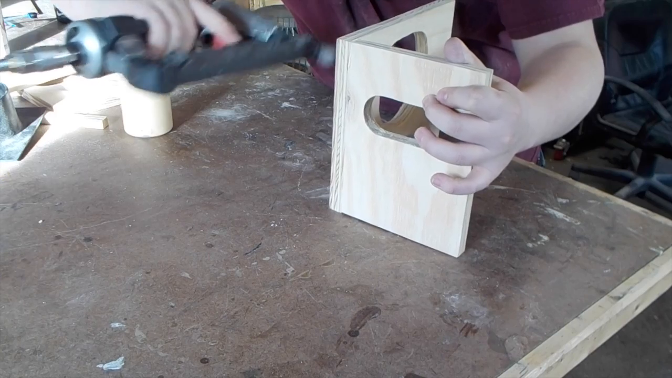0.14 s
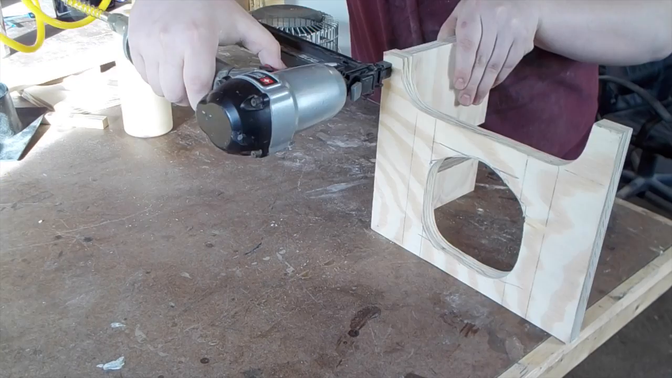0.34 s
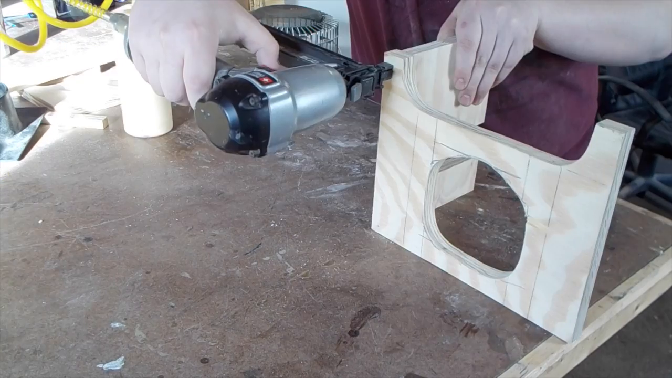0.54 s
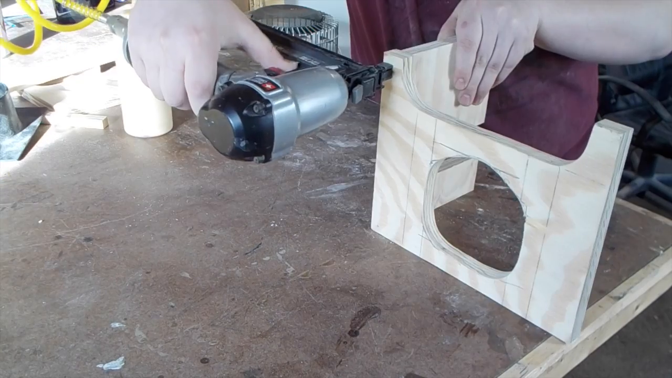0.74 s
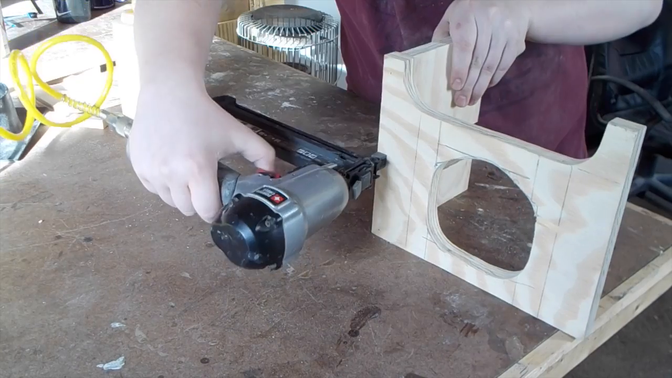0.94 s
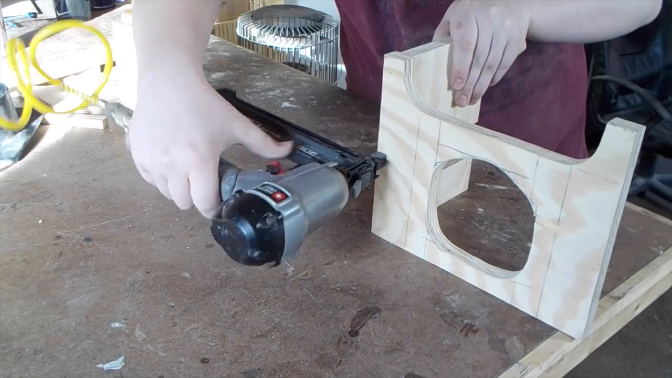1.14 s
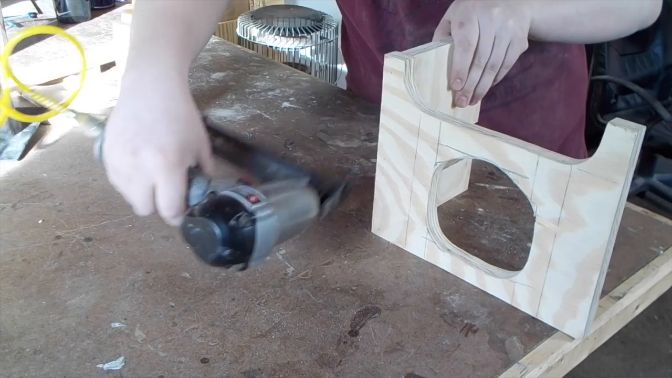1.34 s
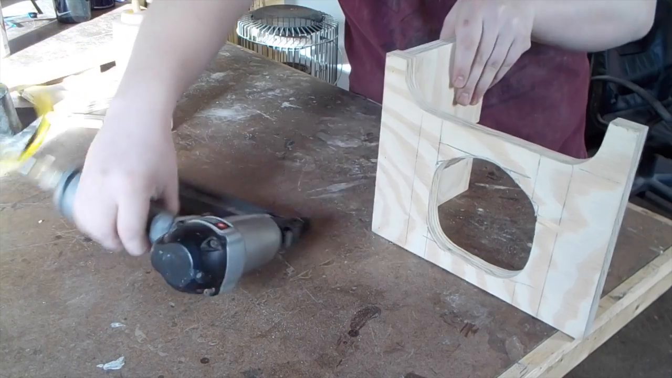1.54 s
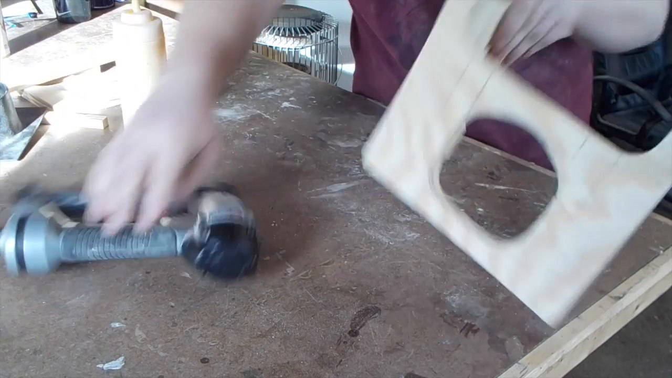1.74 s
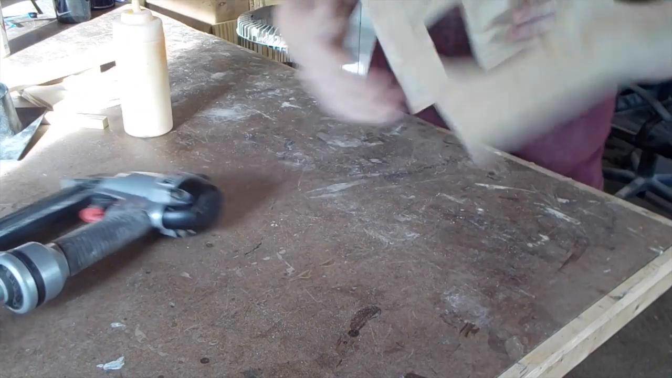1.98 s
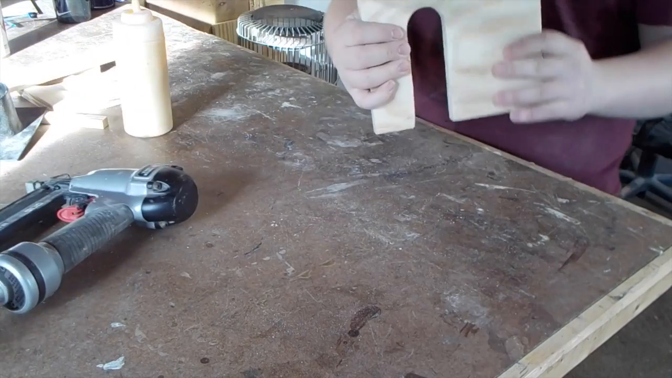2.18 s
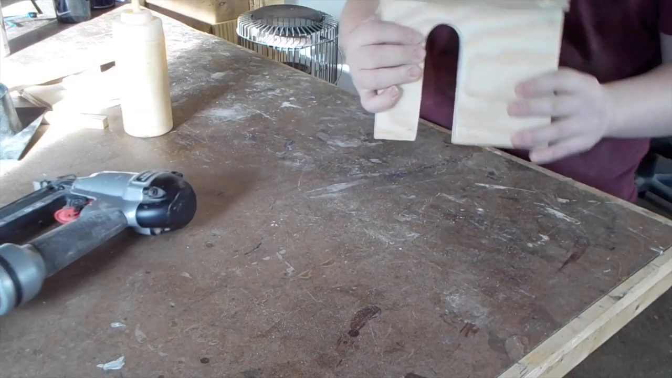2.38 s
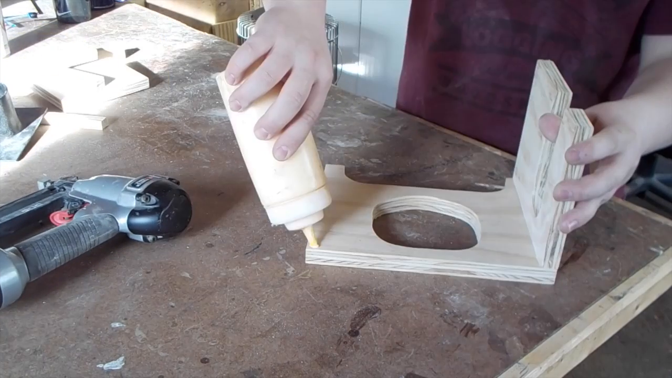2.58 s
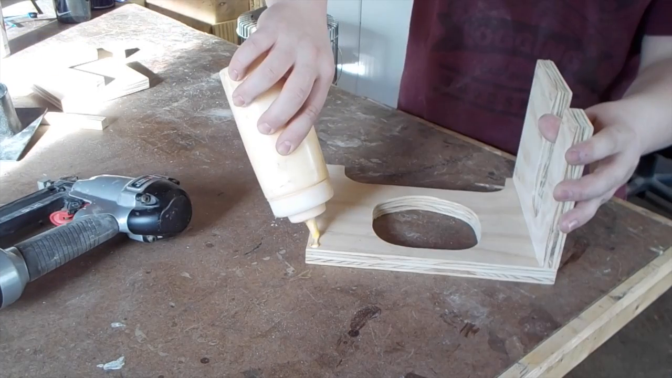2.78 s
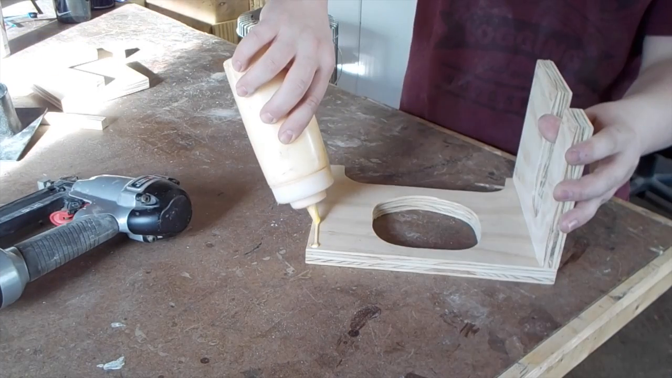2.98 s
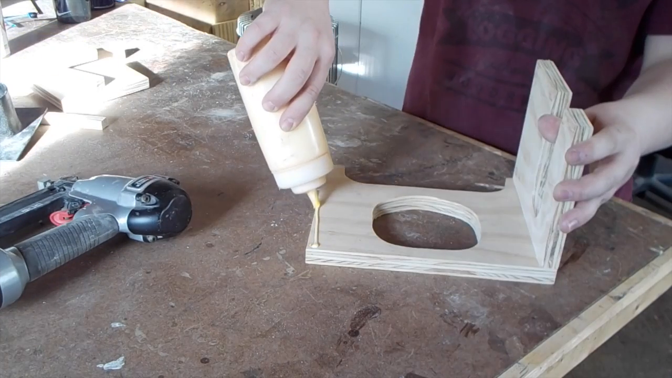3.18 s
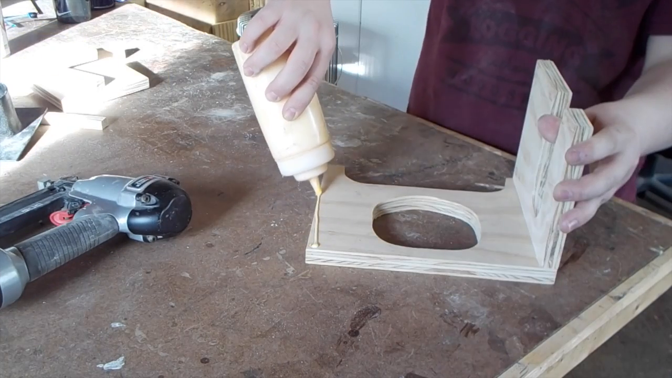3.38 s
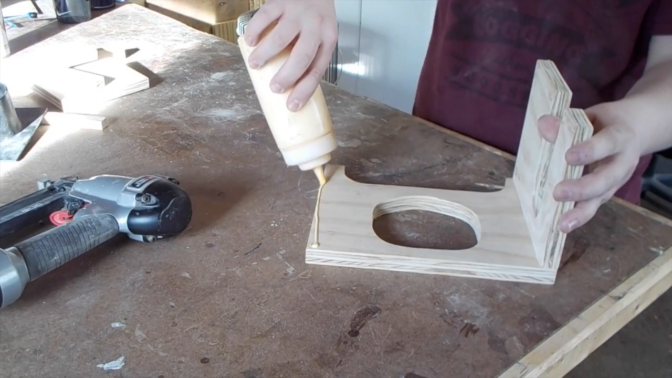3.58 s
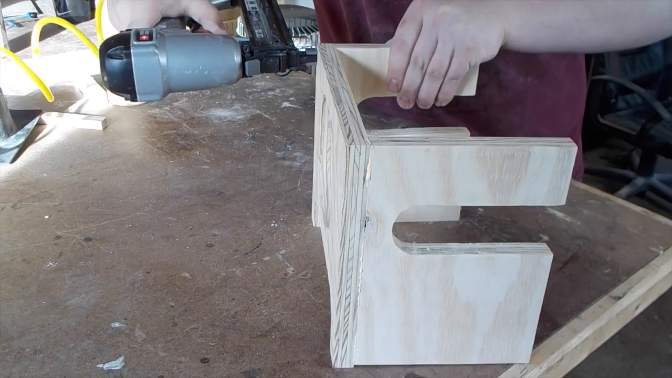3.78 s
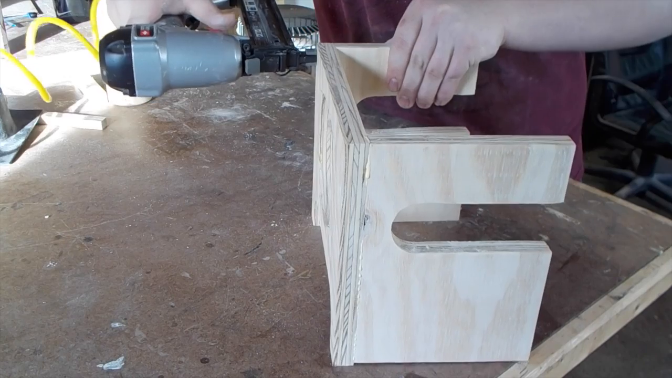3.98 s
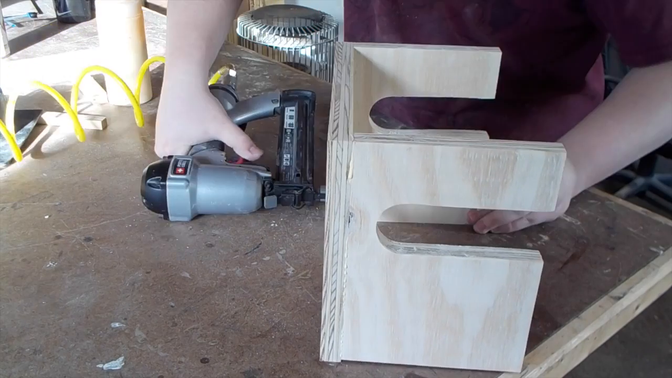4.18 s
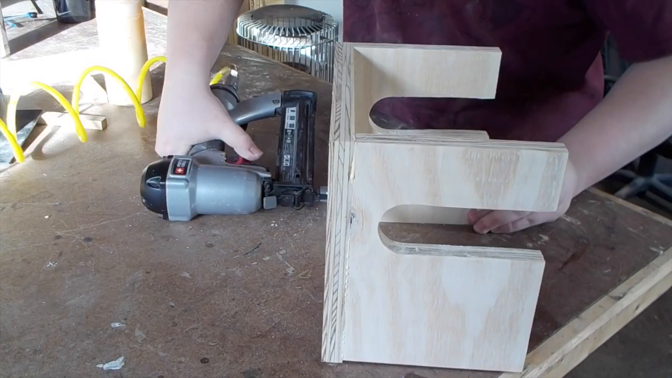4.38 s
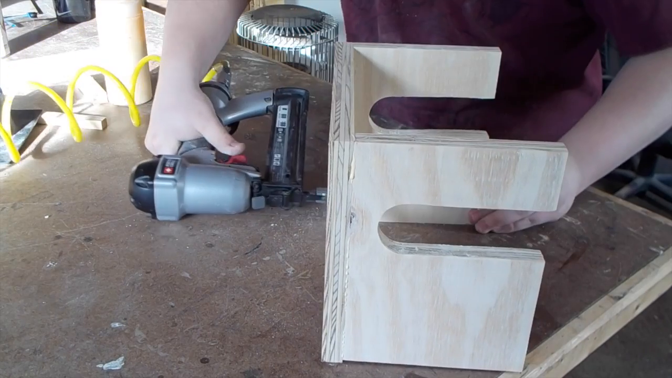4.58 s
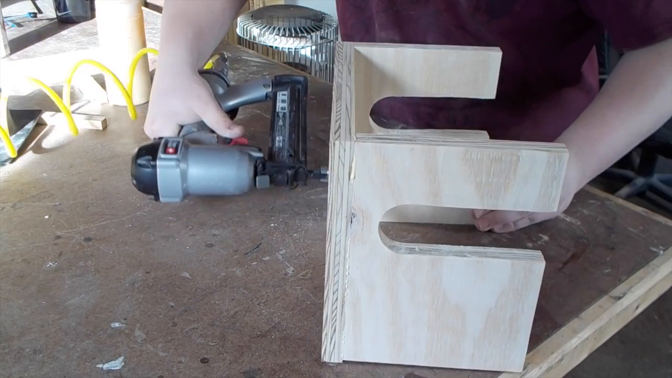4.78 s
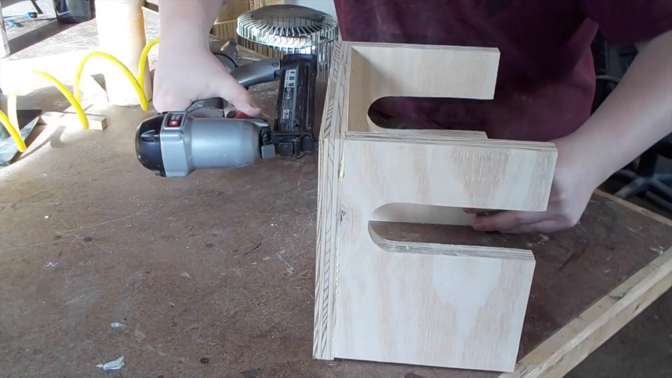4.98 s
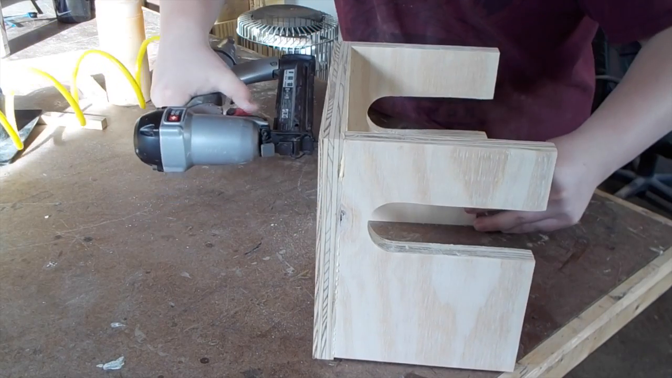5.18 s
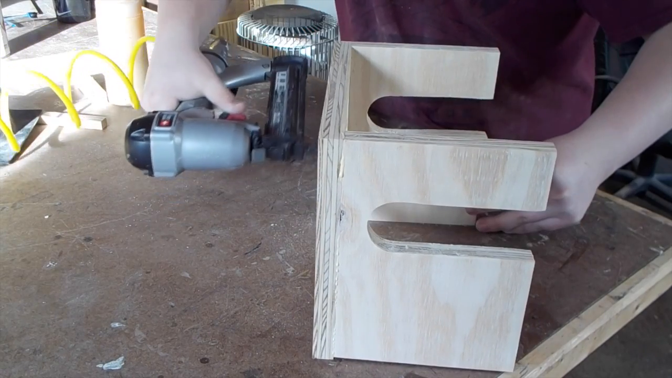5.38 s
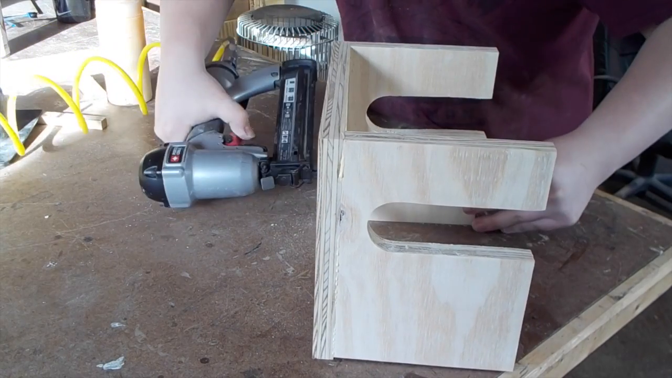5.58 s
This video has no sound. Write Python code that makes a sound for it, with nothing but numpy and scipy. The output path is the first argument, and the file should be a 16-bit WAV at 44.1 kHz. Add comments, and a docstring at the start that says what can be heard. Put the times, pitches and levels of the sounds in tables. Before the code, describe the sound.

Sharp nail gun cracks with short air puffs come in two runs, separated by a clatter, wooden bumps and a brief pause.

```python
"""A puff of exhaust air dies away, then a pneumatic brad nailer tacks plywood on a workbench, twice.
Each shot is a spit of turbulent air from the trigger valve, the crack of the driver's impact, and a
puff as the trigger is let go. The gun is put down with a clatter that excites the modes of the bench;
boards bump, slide and creak; four more shots follow. The camera's gain control ducks at every crack
and, recovering, holds up the reverberation of the workshop."""
import sys
import numpy as np
from scipy import signal
from scipy.fft import rfft, irfft, next_fast_len
from scipy.io import wavfile
from scipy.ndimage import uniform_filter1d, map_coordinates

SR = 44100
rng = np.random.default_rng(int(sys.argv[2]) if len(sys.argv) > 2 else 0)


def master_out(mix):
    """Clip the mix to full scale and print it as 16-bit PCM to the path in sys.argv[1]."""
    frames = np.transpose(np.atleast_2d(mix))
    ceiling = np.clip(frames, -1, 1)
    pcm = np.round(ceiling * 32767).astype(np.int16)
    wavfile.write(sys.argv[1], SR, pcm)


N = 248283
LEAD = SR // 2  # samples of scene before time zero
AGE = np.arange(SR) / SR  # time within one event, t/s
FRAME_HZ = 545  # hollow note of the glued plywood frame
REBOUND_S, REBOUND_DB = .021, -7  # a knock or bump rebounds once, weaker

# spectrum of a wooden thud: f/Hz, level/dB
THUD_SPECTRUM = [(40, -4.5), (150, 10), (300, 7.5), (1000, 5.5), (2000, 6.5), (4000, -21.5), (8000, -25),
                 (15000, -25)]
# spectrum of a metal click: f/Hz, level/dB
CLICK_SPECTRUM = [(100, -23.5), (1000, -3), (3000, 2), (6500, 3), (10000, 10.5), (15000, 9)]


def amp(db):
    """Decibel law: the amplitude ratio of a level."""
    return 10 ** (np.asarray(db) / 20)


def along(points, hz):
    """Interpolation of (f/Hz, value) points on a logarithmic frequency axis."""
    f, values = np.transpose(points)
    return np.interp(np.log(hz + 1), np.log(f + 1), values)


def colour(x, spectrum):
    """Minimum-phase filtering: folding the cepstrum makes a (f/Hz, level/dB) curve causal."""
    n = x.shape[-1]
    m = 2 * next_fast_len(n // 2 + 4096)
    gain = amp(along(spectrum, np.fft.rfftfreq(m, 1 / SR)))
    cepstrum = irfft(np.log(gain))
    cepstrum[1:m // 2] *= 2
    cepstrum[m // 2 + 1:] = 0
    return irfft(rfft(x, m) * np.exp(rfft(cepstrum)), m)[..., :n]


def delayed(x, seconds):
    """Pure delay within one event."""
    return np.pad(x, ((0, 0), (round(seconds * SR), 0)))[:, :SR]


def swell(rise, hold, t60):
    """Exponential rise, and exponential decay once the hold is over; all three in seconds."""
    return (1 - np.exp(-AGE / rise)) * amp(-60 * np.maximum(AGE - hold, 0) / t60)


def flutter_noise(envelope, flutter_db):
    """Turbulence or friction: mid and side noise whose strength flutters at random."""
    flutter = map_coordinates(rng.standard_normal(256), [AGE * 250])  # 250 values a second
    return rng.standard_normal((2, SR)) * envelope * amp(flutter_db * flutter)


def impact(hold, t60):
    """Impulsive excitation: a few milliseconds of hard contact have a flat spectrum."""
    shape = np.sqrt(swell(0.00035, hold, t60))
    burst = rng.standard_normal((2, SR)) * shape
    whitened = irfft(np.exp(1j * np.angle(rfft(burst))))
    return whitened * shape * np.linalg.norm(shape)


def ring(hz, t60):
    """Damped oscillation of one mode, swelling over its first half cycle."""
    return np.sin(2 * np.pi * hz * AGE) * (1 - np.exp(-2 * hz * AGE)) * amp(-60 * AGE / t60)


def struck(modes):
    """Modal superposition: a blow excites each mode with a new strength and sign."""
    scatter_db = rng.normal(0, 2, len(modes))
    signs = rng.choice([-1, 1], len(modes))
    return sum(sign * amp(db + extra_db) * ring(hz, t60)
               for (hz, db, t60), extra_db, sign in zip(modes, scatter_db, signs))


def background(size, level_db=-60):
    """Stationary noise: hiss over a faint rumble."""
    # noise floor: f/Hz, level/dB
    floor_spectrum = [(18, -81), (30, -44.5), (90, -34.5), (161, -20.5), (280, -9), (355, -14), (866, -4),
                      (962, -4), (1910, -4), (2410, -21.5), (2610, -17), (2980, -23.5), (4780, -5),
                      (6380, -0.5), (7870, -35.5), (9220, -21), (16000, -18)]
    hiss = colour(rng.standard_normal((2, size)), floor_spectrum)
    noise = colour(hiss, [(25, 15), (100, -3)])  # lifts the rumble
    return amp(level_db) * noise / noise.std()


def workshop(x, build_up_s=0.0087):
    """Reverberation: a diffuse field builds up behind the sound and decays at each band's own rate."""
    # reverberation time: f/Hz, T60/s
    decay_times = [(150, 0.19), (500, 0.35), (1500, 0.38), (5500, 0.34), (12000, 0.27)]
    # spectrum of the diffuse field: f/Hz, level/dB
    room_spectrum = [(60, -7), (300, -9), (1500, -2.4), (5500, -3.9), (9000, -15), (15000, -22.5)]
    hz, t, bands = signal.stft(rng.standard_normal((2, SR)), SR, nperseg=256)
    t60 = along(decay_times, hz)[:, None]
    decay = amp(-60 * t / t60) * np.sqrt(2 * np.log(1000) / (t60 * SR))  # unit energy per band
    band_gain = amp(along(room_spectrum, hz))[:, None]
    tail = signal.istft(bands * decay * band_gain, SR, nperseg=256)[1][:, :SR]
    # the bench top and the boards reflect first, the walls take a moment longer
    early = amp(-5.5) * swell(rise=.002, hold=0.0056, t60=0.024)
    late = 1 - np.exp(-AGE / build_up_s)
    return x + signal.fftconvolve(x[:1], tail * (early + late), axes=1)[:, :SR]


def add(track, s, sound, gate_t60=.03):
    """Superposition: a sound and its reverberation enter at time s and ring until the next cutoff."""
    # moments at which all ringing stops short: t/s
    cutoffs = [0.389, 0.889, 2.58, 4.256, 5.591]
    end = min([cutoff for cutoff in cutoffs if cutoff > s], default=np.inf)
    gate = amp(-60 * np.maximum(s + AGE - end, 0) / gate_t60)
    start = LEAD + round(s * SR)
    track[:, start:start + SR] += workshop(sound) * gate


def contact(db, click_db, bench_db, soft_db=-9.5, hardness=.3):
    """Collision: a wooden thud and a metal click, then free vibration of bench and gun housing."""
    # modes of the bench top: f/Hz, level/dB, T60/s
    bench_modes = [(173, -8.5, 0.14), (295, 4.5, 0.1), (385, 1, 0.18), (421, 11, 0.13), (535, -3, 0.14),
                   (605, 2, 0.11), (696, 4.5, 0.091), (1160, -15.5, .06)]
    # modes of the gun's housing: f/Hz, level/dB, T60/s
    housing_modes = [(468, -7.5, 0.012), (1083, -1, 0.013), (1743, -12.5, .01)]
    knock = colour(impact(hold=0.0021, t60=.018), THUD_SPECTRUM)
    knock += amp(click_db) * colour(impact(hold=.002, t60=0.018), CLICK_SPECTRUM)
    knock = colour(knock, [(7000, 0), (10000, soft_db + hardness * db)])  # harder contact is brighter
    knock[0] += amp(bench_db - 13.5) * struck(bench_modes) + struck(housing_modes)
    return amp(db) * knock


def boards(track, click_db=-22, bench_db=-6, ease_db=8):
    """Impact and friction: the plywood bumps, creaks and slides as it is turned over."""
    # the frame bumps the bench: t/s, level/dB
    bumps = [(.305, -32), (2.123, -16), (2.165, -19), (2.511, -40), (4.891, -33.5)]
    # dry boards creak against each other: t/s, level/dB, f/Hz
    creaks = [(2.323, -36, 1690), (2.338, -29.5, 2710), (2.342, -30, 1750), (2.374, -27.5, 1770)]
    # boards slide over the bench and through the hands: t/s, duration/s, level/dB
    slides = [(1.86, .26, -24), (2.13, .06, -21), (2.23, .34, -41)]
    # rubbing wood: f/Hz, level/dB
    rub_spectrum = [(60, -17), (200, 7.5), (500, 7.5), (1000, 2.5), (2000, 1.5), (4000, -7.5), (6500, -9),
                    (15000, -22)]
    for s, db in bumps:
        bump = contact(db, click_db, bench_db)
        bump[0] += amp(db) * ring(FRAME_HZ, t60=.04)
        add(track, s, bump)
        add(track, s + REBOUND_S, contact(db + REBOUND_DB, click_db, bench_db))
    for s, db, hz in creaks:
        add(track, s, amp(db) * np.array([ring(hz, t60=.015), np.zeros(SR)]))
    for s, length, db in slides:
        pressure = swell(rise=.008, hold=length, t60=.1) * amp(db - ease_db * AGE / length)
        add(track, s, colour(flutter_noise(pressure, flutter_db=2.5), rub_spectrum))


def gun_handling(track, rattle_db=-11, metal_db=4.5, rebound_max_db=-8):
    """Inelastic collisions: the gun knocks on the bench and rebounds, and its metal parts clack."""
    # the gun is put down and rocks: t/s, level/dB, relative bench ring/dB
    knocks = [(1.594, 28, -8), (1.6885, 5, 1), (1.742, -11, 10), (1.813, -14.5, -1), (1.884, -22, 1.5)]
    # safety tip and magazine: t/s, level/dB
    clacks = [(.378, -19.5), (1.529, -12), (1.630, 8.5), (1.691, 4.5), (1.855, -23.5), (1.9285, -20),
              (1.936, -22), (3.819, -51), (4.832, -39), (4.844, -41)]
    for s, db, bench_db in knocks:
        add(track, s, contact(db, rattle_db, bench_db))
        rebound_db = min(db + REBOUND_DB, rebound_max_db)  # the hand holds back the hardest
        add(track, s + REBOUND_S, contact(rebound_db, rattle_db, bench_db))
    for s, db in clacks:
        add(track, s, contact(db - metal_db, metal_db, bench_db=-19))


def valve_spit(click_db):
    """Jet noise: air spits from the trigger valve, which clicks open."""
    # valve air: f/Hz, level/dB
    valve_spectrum = [(100, -11), (500, -20), (1500, -9), (3500, -8.5), (6000, 0.5), (9000, 7.5),
                      (15000, -7)]
    spit = flutter_noise(swell(rise=0.0047, hold=0.0061, t60=0.35), flutter_db=2.0)
    spit += amp(click_db) * delayed(impact(hold=0.00033, t60=0.009), seconds=0.0075)
    return colour(spit, valve_spectrum)


def exhaust(bleed_db=-14.2, snap_db=3, piston_db=-11.5):
    """Turbulent discharge: the valve snaps back, the cylinder empties, the return chamber bleeds out."""
    # exhaust air: f/Hz, level/dB
    air_spectrum = [(100, -8.5), (500, -4), (1500, -17), (3500, -3.2), (6000, 1.5), (11000, 10),
                    (15000, -6)]
    dump = swell(rise=0.0019, hold=.016, t60=0.042)
    bleed = amp(bleed_db) * swell(rise=.01, hold=0.008, t60=0.36)
    air = colour(flutter_noise(dump + bleed, flutter_db=3.4), air_spectrum)
    snap = colour(delayed(impact(hold=0.0014, t60=0.003), seconds=.0015), CLICK_SPECTRUM)
    piston_stop = colour(delayed(impact(hold=0.0064, t60=0.017), seconds=.012), THUD_SPECTRUM)
    return air + amp(snap_db) * snap + amp(piston_db) * piston_stop


def driver_crack(board_hz, frame_db, board_db=3, thud_db=-13):
    """Impact excitation: the driver hits the nail, the board rings briefly and the hollow frame thuds."""
    # the driver's blow: f/Hz, level/dB
    crack_spectrum = [(40, 1.5), (200, 6), (700, 1), (2000, -2), (3000, -4), (6000, -3), (9000, 6),
                      (15000, -1.5)]
    crack = colour(impact(hold=0.0038, t60=.006), crack_spectrum)
    crack += amp(frame_db + thud_db) * colour(impact(hold=.003, t60=.006), THUD_SPECTRUM)
    crack[0] += amp(board_db) * ring(board_hz, t60=0.0054)
    crack[0] += .5 * amp(frame_db) * ring(FRAME_HZ, t60=0.006)
    return crack


def nailer(track, spit_db=-9.5, crack_db=37.3, puff_db=9.5, usual_hold_s=.15, build_db_per_s=55):
    """Pneumatic cycle: spit, crack, exhaust; a trigger held longer builds up a louder exhaust."""
    # one row per nail: pull t/s, strike t/s, release t/s, force level/dB, valve click level/dB,
    # board f/Hz, hollow frame level/dB
    shots = [(-.215, -.17, -.022, 0, -4, 1373, -10), (.474, .5232, .666, -3.5, 10, 1340, -5),
             (.933, .9754, 1.136, 3.5, -7, 1433, -12), (3.842, 3.886, 3.992, -3.5, 9, 1780, 3),
             (4.283, 4.321, 4.459, -1, -2, 1242, 9), (5.093, 5.1423, 5.295, 1.5, -4, 1230, 3),
             (5.612, 5.657, 5.81, -2, -10, 1230, 3)]
    for pull_s, strike_s, release_s, force_db, click_db, board_hz, frame_db in shots:
        add(track, pull_s, amp(spit_db + .5 * force_db) * valve_spit(click_db))
        add(track, strike_s, amp(crack_db + force_db) * driver_crack(board_hz, frame_db))
        built_up_db = build_db_per_s * (release_s - strike_s - usual_hold_s)
        add(track, release_s, amp(puff_db + built_up_db) * exhaust())


def gain_control(x, ceiling_db=-13.8, recovery_db_per_s=158):
    """Compression: gain drops above the ceiling, missing a crack's first peak, and recovers steadily."""
    # weighting of the level detector: f/Hz, level/dB
    detector_response = [(500, -6), (2000, 1.3), (5000, 2.5), (15000, -13.5)]
    sensed = np.mean(colour(x, detector_response) ** 2, axis=0)
    power = np.abs(uniform_filter1d(sensed, SR // 300, origin=20))
    excess_db = np.maximum(10 * np.log10(power + 1e-12) - ceiling_db, 0)
    recovery_db = recovery_db_per_s * np.arange(x.shape[1]) / SR
    cut_db = np.maximum.accumulate(excess_db + recovery_db) - recovery_db
    return x * amp(-uniform_filter1d(cut_db, size=SR // 800))


def scene(balance_db=0.72):
    """Mid-side stereophony: gun, boards and hiss reach two close microphone ports and their gain control."""
    # frequency response of the microphone: f/Hz, level/dB
    mic_response = [(30, -33.5), (90, -31), (400, -11), (1300, -3), (2050, -3), (2500, -21.5),
                    (2750, -11.5), (3050, -19), (3500, -7.5), (4000, -12), (4650, -1.5), (6600, 1.5),
                    (7400, -19.5), (8250, -49), (9500, -29), (15500, -24)]
    # stereo width, as a weighting of the side signal: f/Hz, level/dB
    side_response = [(60, -4.5), (110, -8), (200, -14), (380, -15), (700, -13), (1290, -13.5),
                     (2380, -11.5), (4400, -4), (8120, 2), (15000, -5.5)]
    track = np.zeros((2, LEAD + N + 2 * SR))
    nailer(track)
    gun_handling(track)
    boards(track)
    heard = colour(track[:, :LEAD + N + SR // 10], mic_response)
    mid, side = heard + background(heard.shape[1])
    side = amp(-4) * colour(side, side_response)
    ports = np.array([(mid + side) * amp(balance_db), (mid - side) * amp(-balance_db)])
    return gain_control(ports)[:, LEAD:LEAD + N]


def record(dry, top_hz=16000):
    """Band limiting: the camera thins the bass and passes nothing above its top frequency."""
    # wind filter: f/Hz, level/dB
    wind_filter = [(20, -15), (50, -14), (110, -3.5), (220, 0.5)]
    m = next_fast_len(N + SR // 2)
    passband = np.fft.rfftfreq(m, 1 / SR) < top_hz
    return irfft(rfft(colour(dry, wind_filter), m) * passband, m)[:, :N]


dry = scene()
out = record(dry)
master_out(out)
```